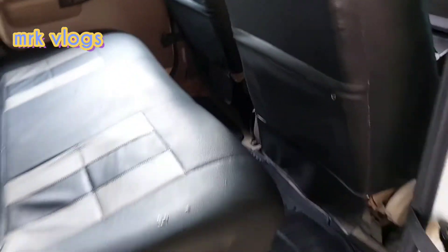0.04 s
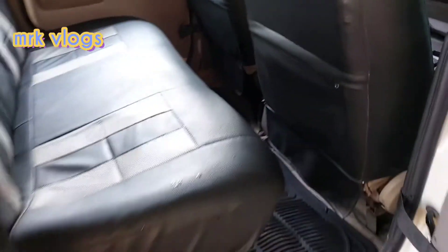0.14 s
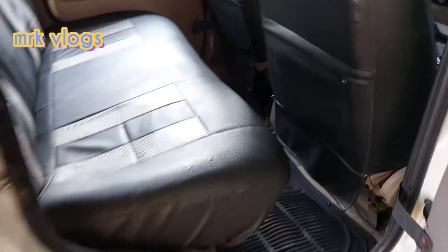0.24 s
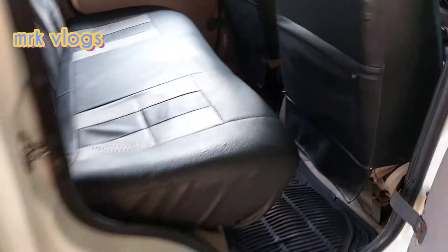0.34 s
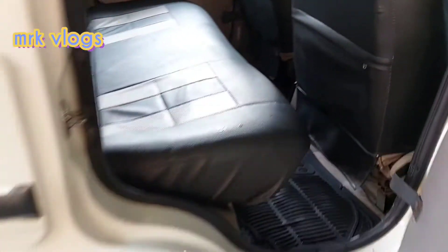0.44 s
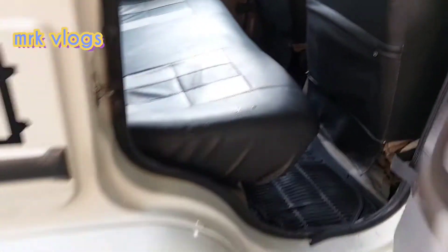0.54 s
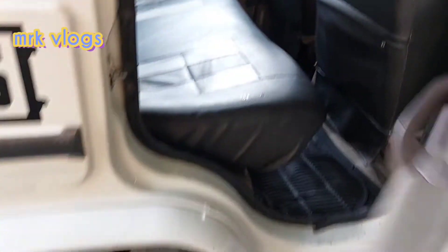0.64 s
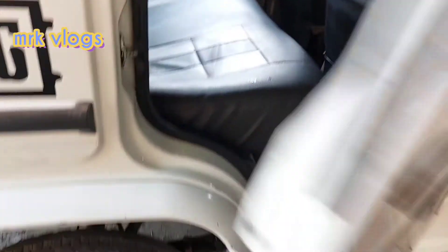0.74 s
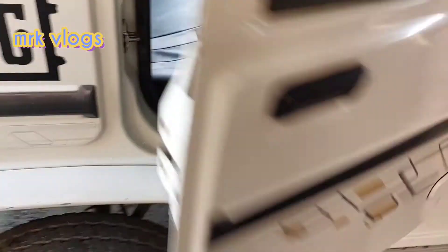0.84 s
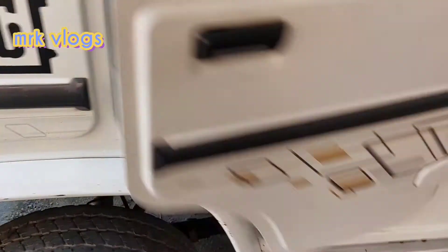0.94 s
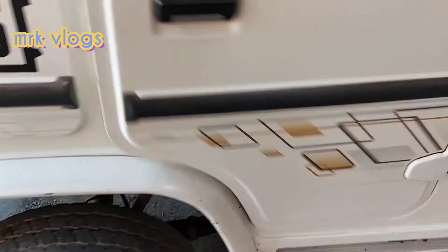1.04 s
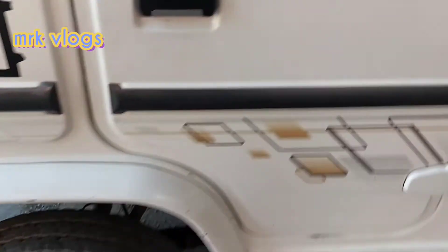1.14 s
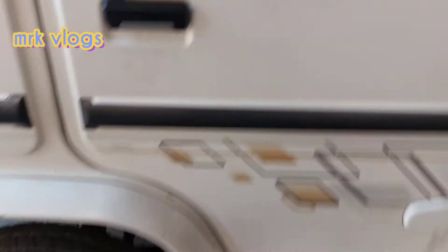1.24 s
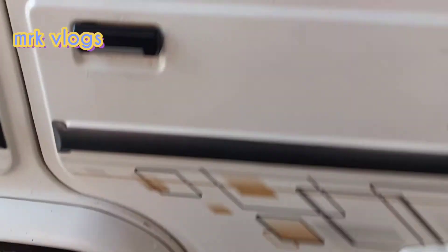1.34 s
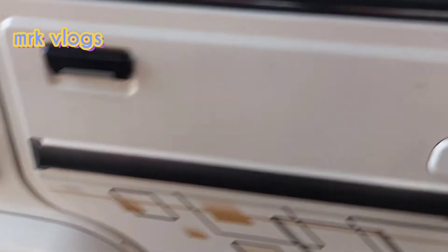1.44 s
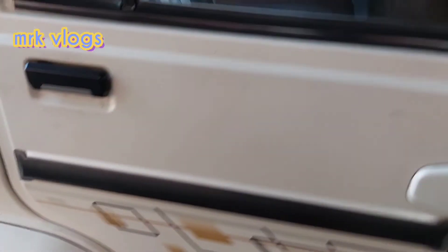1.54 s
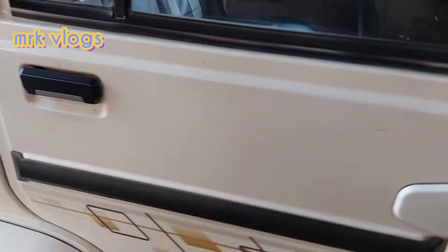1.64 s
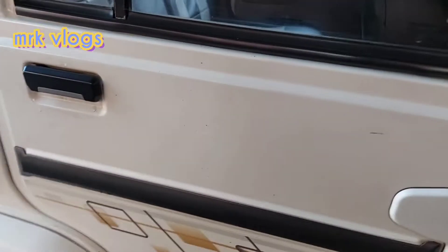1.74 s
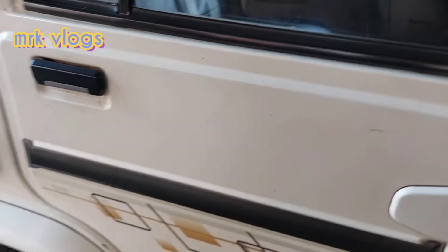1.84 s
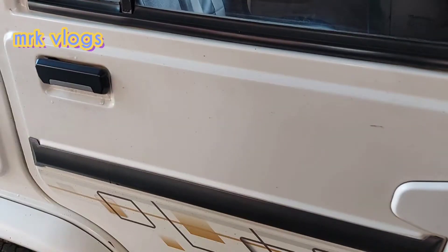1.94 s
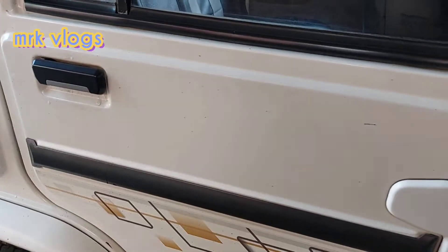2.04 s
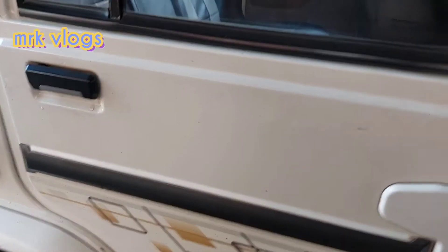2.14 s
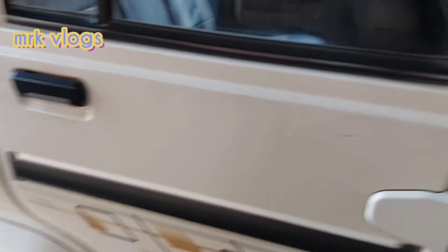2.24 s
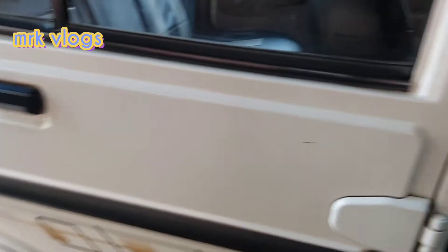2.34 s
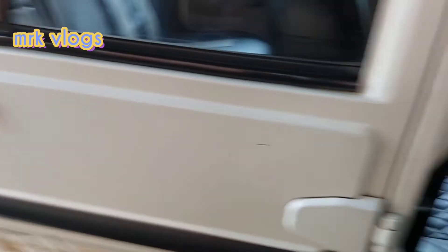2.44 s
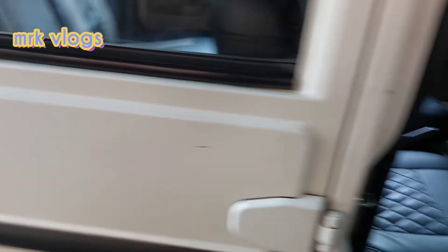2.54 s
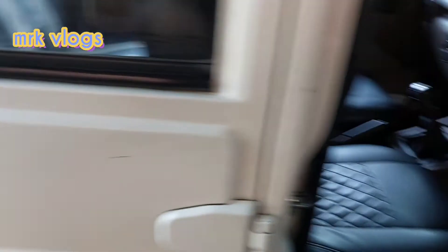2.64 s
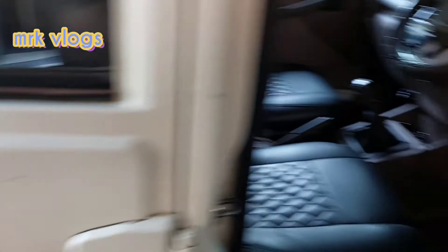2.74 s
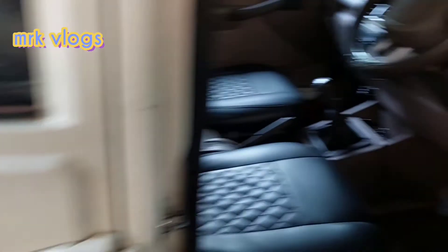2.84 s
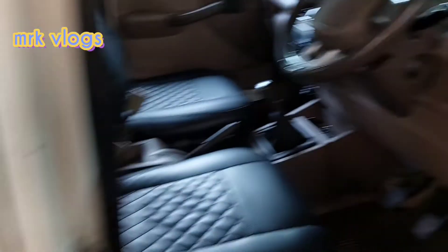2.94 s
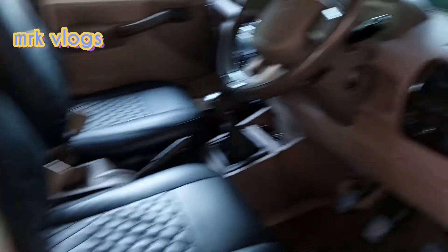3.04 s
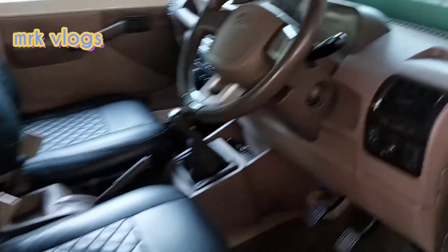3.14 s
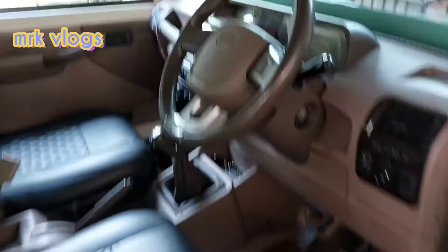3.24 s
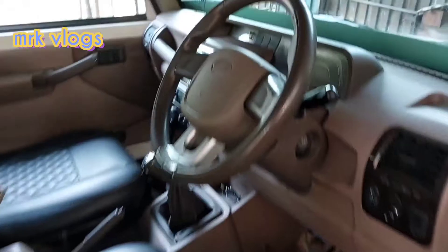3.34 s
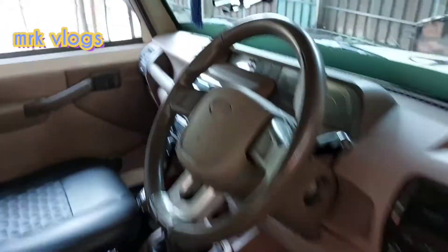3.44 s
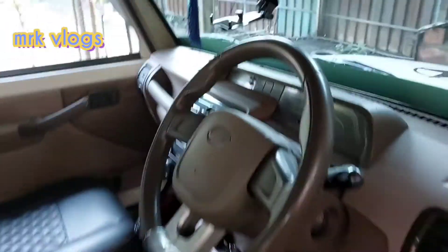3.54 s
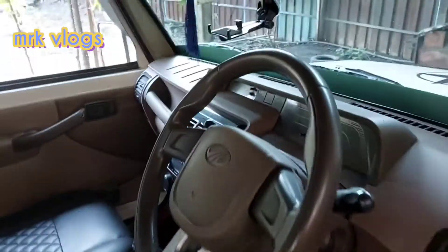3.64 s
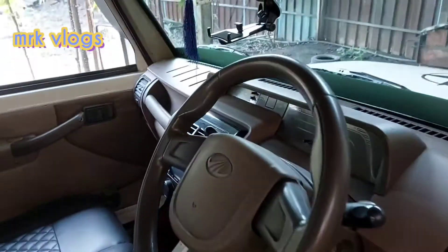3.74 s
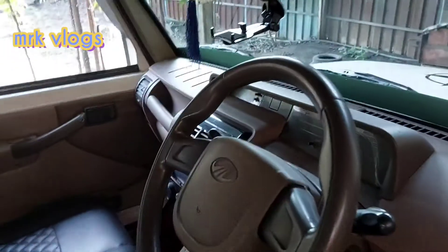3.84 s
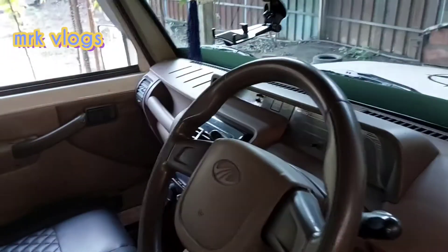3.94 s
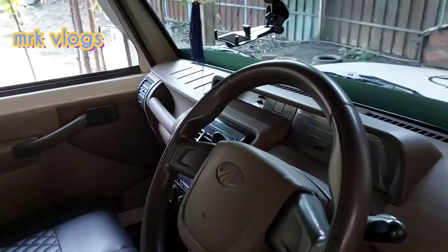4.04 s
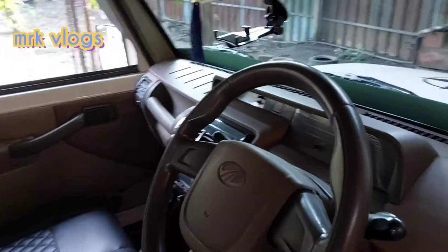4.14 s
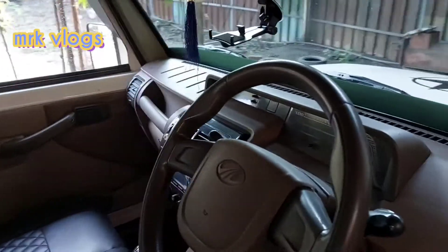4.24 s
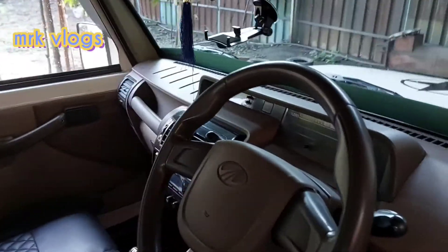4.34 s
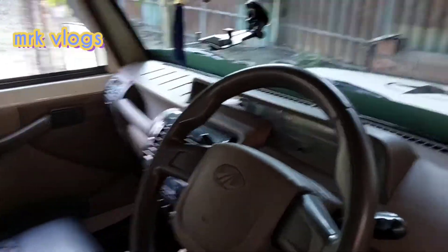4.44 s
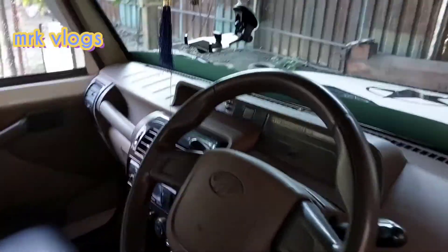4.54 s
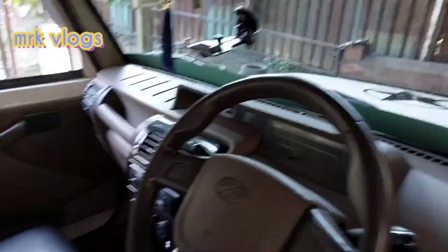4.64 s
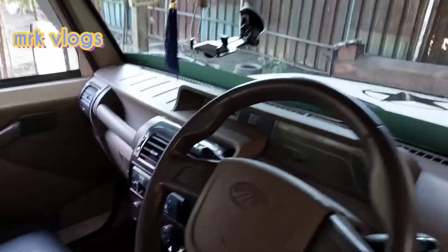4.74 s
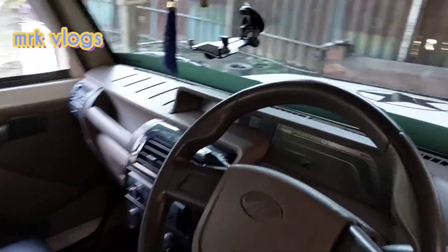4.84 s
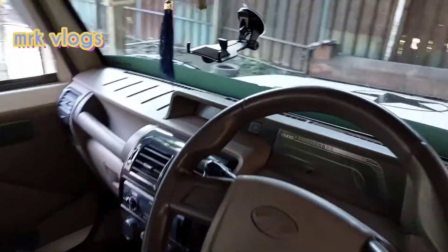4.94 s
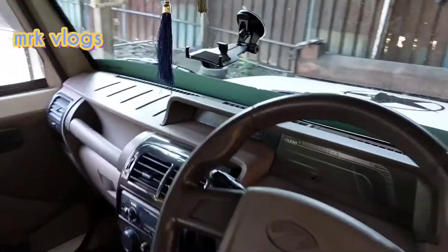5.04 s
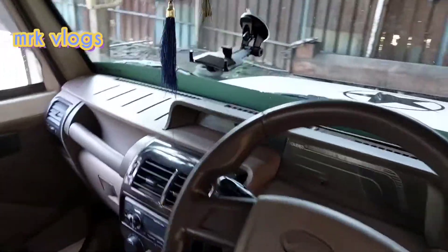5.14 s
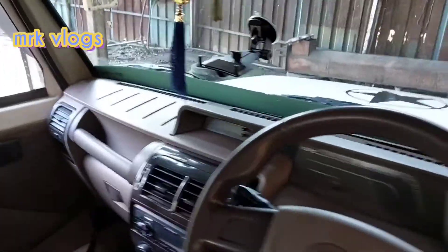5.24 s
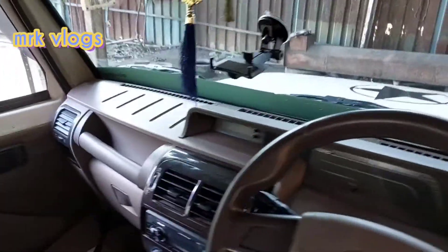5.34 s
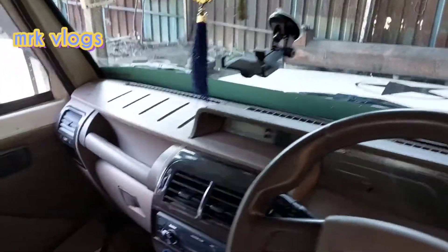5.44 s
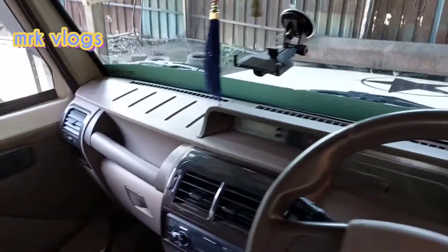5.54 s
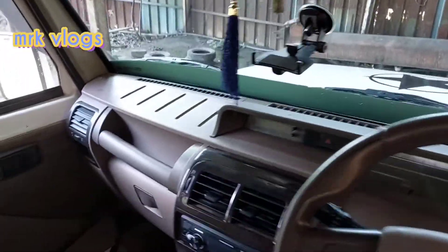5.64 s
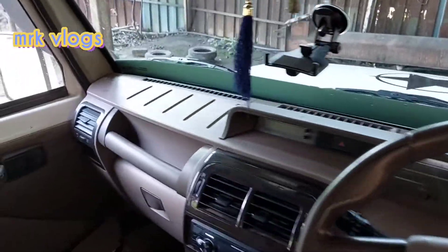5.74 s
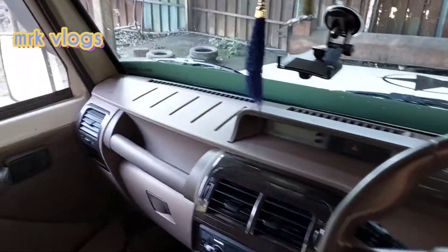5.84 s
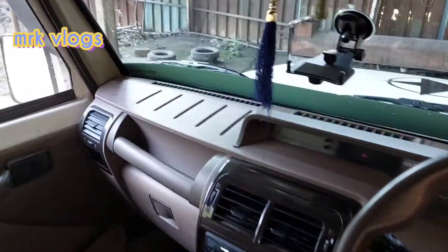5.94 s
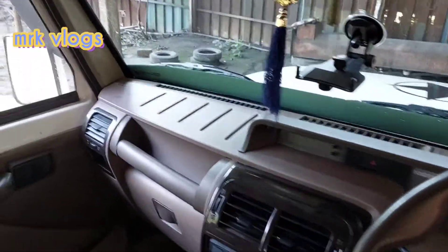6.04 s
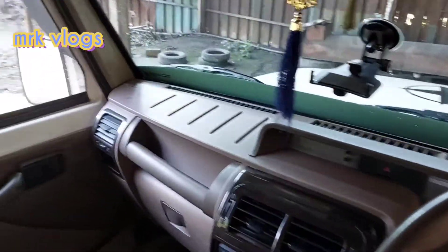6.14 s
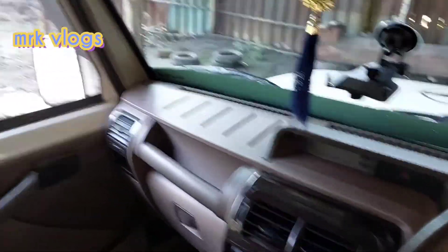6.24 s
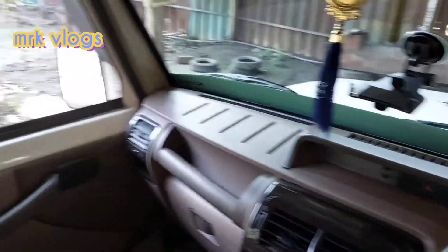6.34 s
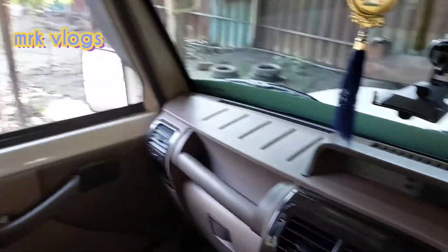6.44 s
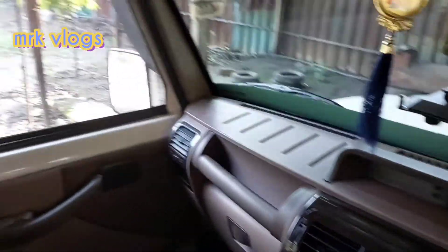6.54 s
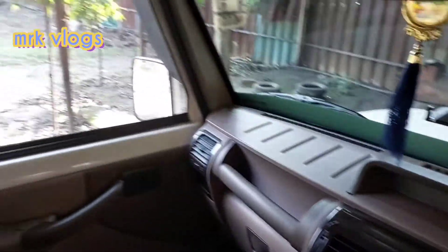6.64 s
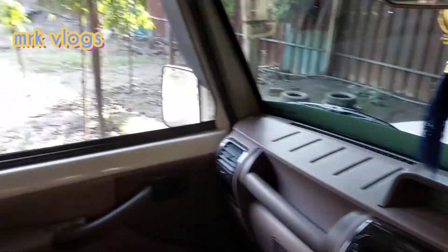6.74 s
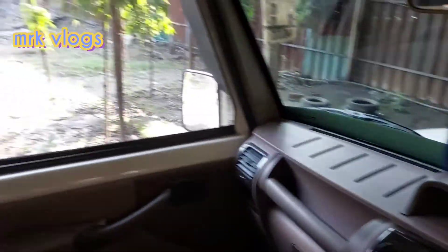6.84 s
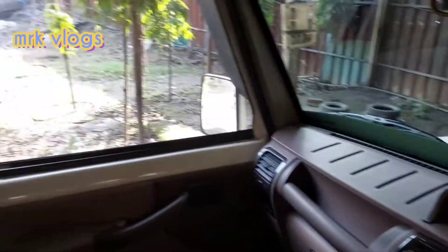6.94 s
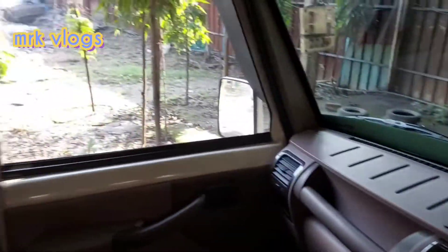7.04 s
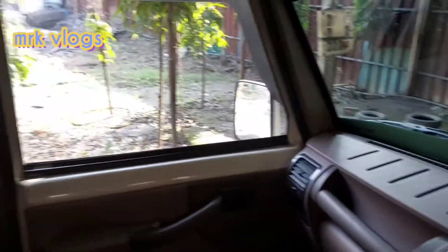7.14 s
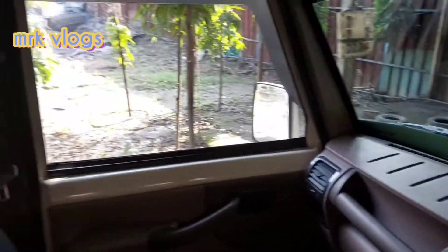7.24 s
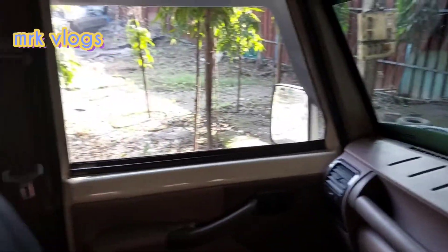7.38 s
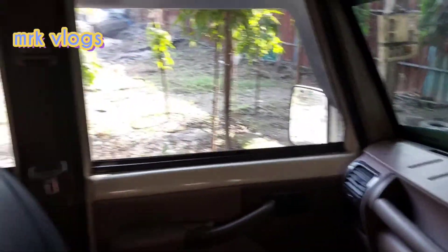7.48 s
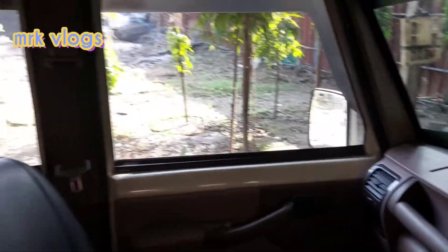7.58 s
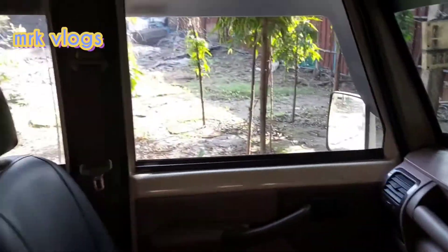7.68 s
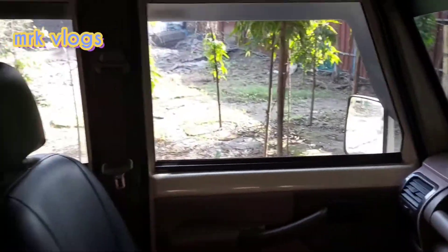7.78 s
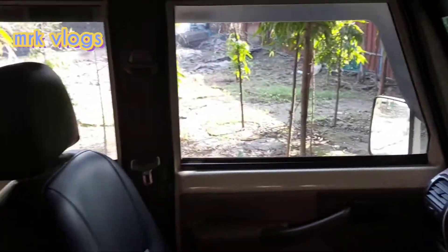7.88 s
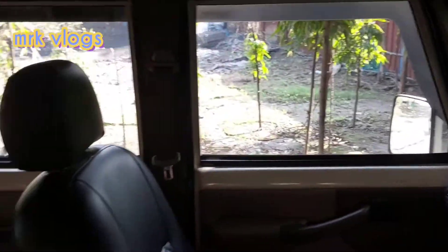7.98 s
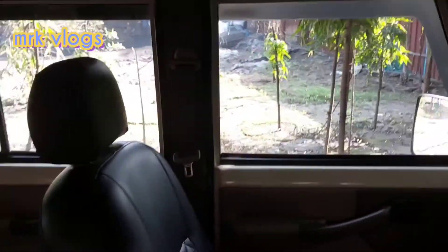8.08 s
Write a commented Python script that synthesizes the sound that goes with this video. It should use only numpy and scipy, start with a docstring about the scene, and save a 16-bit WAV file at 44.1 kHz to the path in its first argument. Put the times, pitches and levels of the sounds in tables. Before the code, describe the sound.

A handheld stereo microphone beside a parked vehicle picks up soft road wash, slightly left, a throbbing low engine idle some way off and a very faint grainy hiss. At 0.1 s a finger tick and tiny key clink; near 0.8-1.1 s faint contact, cloth brushes and small ticks. At 1.32 s the door slams: a loud dense metal bang, latch clatter and deep thuds within a tenth of a second, with a short boomy tail. A tick at 1.73 s. At 2.17-2.3 s quieter hollow knocks on trim with a scuff. Low bumps at 2.8-2.9 s. Keys clink at 3.03 s, then jingle brightly at 3.75-3.95 s; scuffs at 4.0-4.1 s and 4.35 s. Sharp close finger snaps at 4.77-4.84 s, strongly left, and a faint tick at 5.1 s. From then to 8.1 s only the duller, quieter road and idle hum inside the cab.

```python
"""A van door slams: blows of metal excite modes of the body and a dense tail, as later knocks on the trim do.
A hand-held camera leans into the cab: fingers tick as tiny snaps, and seal and hand thud as falling sines.
Keys clink as chattering contacts on short close modes; shoes and cloth scuff as trains of friction slips.
Behind lie a road, as noise shaped by the shelter of the cab, an idling engine some way off, as sines on
multiples of its firing rate, and a thin grainy hiss."""
import sys
import numpy as np
from scipy import signal
from scipy.fft import rfft, irfft
from scipy.io import wavfile
from scipy.ndimage import uniform_filter1d

SR = 44100
rng = np.random.default_rng(int(sys.argv[2]) if len(sys.argv) > 2 else 0)


def persist_wave(psi):
    """Save psi, clipped to +-1, as 16-bit WAV."""
    counts = np.round(np.clip(psi, -1, 1) * 32767).astype(np.int16)
    wavfile.write(sys.argv[1], SR, np.atleast_2d(counts).T)


N = 357651  # length in samples

# Where the camera is: time_s, shelter in the cab [0-1], bearing of the road [-1 left to 1 right, clipped],
# direct share of the road [0-1]
CAMERA_POSE = [(0, 0.24, -1.095, 0.07), (1.2, 0.5, -1.513, 0.17), (1.7, 0.36, -0.117, 0),
               (2.2, 0.4, 0.937, 0.21), (2.7, 0.31, 0.014, 0), (3.7, 0.38, 0.4925, 0.54),
               (4.5, 0.45, 0.1583, 0.04), (5.2, 0.75, 0.7655, 0), (6.2, 0.75, 0.811, 0.53),
               (7.1, 0.86, 0.7478, 0.07), (8.11, 0.6, -0.0252, 0.01)]
# Stereo shading by the camera body: pitch_hz, share of the left-right level difference
BODY_SHADING = [(300, 0.), (700, -0.1187), (1500, 0.7952), (4000, 1.4861), (9000, 1.1614), (15000, -2.5)]
# Colour of rubbed cloth, also used for the hiss: pitch_hz, relative level [dB per Hz]
CLOTH_COLOUR = [(2500, -27), (5000, 0), (8000, -3), (12000, -2.5), (16500, -6)]
PORT_GAP_S = 0.00046795  # travel time of sound from one microphone port to the other
SLIPS_PER_S = 9000.0  # average density of the tiny slips in scuffs, rustles and hiss


def amp(db):
    """Gain of a level in dB."""
    return 10 ** (np.asarray(db) / 20)


def evened(x):
    """Scaled to rms 1."""
    return x / np.sqrt(np.mean(x ** 2) + 1e-20)


def read(points, hz):
    """A spectrum table at the frequencies hz, interpolated over log frequency."""
    f, value = np.transpose(points)
    return np.interp(np.log(hz + 1), np.log(f + 1), value)


def along(rows, t):
    """The columns of a curve table at the times t."""
    s, *columns = np.transpose(rows)
    return [np.interp(t, s, c) for c in columns]


def coloured(x, points):
    """x filtered by a spectrum table."""
    size = x.shape[-1]
    gain = amp(read(points, np.fft.rfftfreq(size, 1 / SR)))
    return irfft(rfft(x) * gain, size)


def panned(x, pan_db):
    """Two channels, the left louder than the right by pan_db."""
    return np.array([amp(pan_db / 2), amp(-pan_db / 2)]).reshape(2, -1) * x


def add(mix, s, sound):
    """Mixes a two-channel sound in at s seconds."""
    part = mix[:, round(s * SR):][:, :sound.shape[1]]
    part += sound[:, :part.shape[1]]


def wander(t, per_s):
    """A random drift along straight lines between normal draws, per_s of them a second."""
    return np.interp(t * per_s, np.arange(200), rng.standard_normal(200))


def ring(modes, t, channels):
    """Decaying sines with random phase for each channel."""
    phase = rng.random((len(modes), channels, 1))
    return sum(amp(db - 60 * t / t60) * np.sin(2 * np.pi * (hz * t + p))
               for (hz, db, t60), p in zip(modes, phase))


def grit(size, per_s, spread_db):
    """Two unrelated trains of tiny slips of uneven size."""
    unevenness = amp(spread_db * np.minimum(rng.exponential(1, (2, size)), 4))
    slips = rng.random((2, size)) < per_s / SR
    return unevenness * rng.standard_normal((2, size)) * slips


def diffuse(size):
    """Noise at two ports in a diffuse field: alike in the bass, unrelated in the treble."""
    a, b = rfft(rng.standard_normal((2, size)))
    same = np.sinc(2 * np.fft.rfftfreq(size, 1 / SR) * PORT_GAP_S)
    return irfft([a, same * a + np.sqrt(1 - same ** 2) * b], size)


def road():
    """Noise that is partly diffuse at the two ports, partly from one bearing; the cab dulls it."""
    # Road wash: time_s, relative level_db, left-right pan_db before the shading share
    wash = [(0.0, -42, 5.5), (0.38, -39.5, 6), (1.25, -36, 6), (1.49, -37.5, 6), (1.54, -43.5, 5.5),
            (2.19, -45.5, 5), (2.91, -40, 4.5), (4.81, -40.5, 4), (4.92, -42.5, -0.5), (5.6, -47.5, -1),
            (6.53, -48.5, 0.5), (7.86, -45.5, 0.5), (8.11, -46, 0.5)]
    # Road colour in the open: pitch_hz, relative level [dB per Hz]
    open_air = [(24, -20.5), (40, -6.5), (85, -5), (191, -11), (233, -11.5), (406, -14), (593, -20),
                (1140, -18.5), (1430, -23), (2200, -18.5), (4450, -30), (7180, -50), (13200, -52.5),
                (15300, -64.5), (16500, -73)]
    # Road colour inside the cab: pitch_hz, relative level [dB per Hz]
    in_cab = [(40, -12.5), (65, -4.5), (120, -12.5), (200, -16), (300, -19), (500, -23.5), (1050, -24),
              (1450, -27.5), (2050, -28), (2800, -38.5), (3500, -42), (4800, -46.5), (6500, -58.5),
              (16500, -66)]
    frames, hz = N // 512 + 5, np.fft.rfftfreq(2048, 1 / SR)[:, None]
    t = np.arange(frames) * 512 / SR
    db, pan_db = along(wash, t)
    shelter, bearing, direct = along(CAMERA_POSE, t)
    shelter, direct = np.clip(shelter, 0, 1), np.clip(direct, 0, 1)
    a, b, c, d, patches = rng.standard_normal((frames, 1025, 5)).T
    # patches of time and frequency that swell or sink by chance
    patches = uniform_filter1d(patches, size=16, axis=0)
    patches = evened(uniform_filter1d(patches, size=5, axis=1))
    colour = amp((1 - shelter) * read(open_air, hz) + shelter * read(in_cab, hz))
    colour /= np.sqrt((colour[14:186] ** 2).sum(0))  # the level is set by 300-4000 Hz
    # a diffuse field is alike at both ports as a sinc; a plane wave only arrives later at one
    lag_s = PORT_GAP_S * np.clip(bearing, -1, 1)
    plane_wave = np.exp(2j * np.pi * hz * lag_s)
    same = 0.8989 * ((1 - direct) * np.sinc(2 * hz * PORT_GAP_S) + direct * plane_wave)
    left = a + 1j * b
    right = same * left + np.sqrt(np.clip(1 - abs(same) ** 2, 0, 1)) * (c + 1j * d)
    tilt = amp(pan_db * read(BODY_SHADING, hz) / 2)
    z = np.array([left * tilt, right / tilt]) * colour * amp(db + 1.3139 * patches)
    return amp(1.0) * signal.istft(z, nperseg=2048, noverlap=1536)[1][:, :N]


def engine():
    """Sines on multiples of the firing rate, nearly in step so that they throb; the cab dulls the odd orders."""
    # Idling engine: time_s, firing rate_hz, level_db of order 2, of order 4, of order 6 (before the wander)
    idle = [(0.0, 29.3, -47, -44, -49.5), (0.35, 29.5, -40.5, -36.5, -55.5), (0.5, 29.2, -41.5, -40.5, -45),
            (0.94, 29.9, -42.5, -37.5, -63.5), (1.11, 30.8, -36, -36.5, -51.5),
            (1.6, 32, -40.5, -41.5, -53.5), (2.23, 31.2, -41.5, -58.5, -53.5),
            (2.72, 32.1, -41, -60, -56.5), (3.03, 31.9, -29.5, -41, -45), (3.38, 29.1, -44.5, -41.5, -69.5),
            (3.85, 29.91, -44.5, -46, -57), (4.26, 30, -47.5, -45, -48.5), (4.6, 30, -65, -52.5, -45.5),
            (5.16, 30, -46, -42.5, -52.5), (5.45, 28.9, -48.5, -38, -50.5), (5.87, 29.1, -44, -44, -50),
            (6.57, 28.9, -41, -43.5, -55), (7.12, 29.8, -37, -47.5, -52.5),
            (7.5, 29.2, -36.5, -54.5, -61.5), (7.8, 30.35, -36.5, -47, -47), (8.11, 29.98, -40.5, -57, -48)]
    # Odd orders: multiple of the firing rate, level_db in the open, level_db in the cab (before the wander)
    odd_orders = [(3, -35.5, -62.5), (5, -50, -64.5)]
    fading_db, fades_per_s = 4.0, 5.0  # odd orders fade in and out by chance
    t = np.arange(N) / SR
    hz, *even_db = along(idle, t)
    shelter = np.clip(along(CAMERA_POSE, t)[0], 0, 1)
    levels = [(2 * k + 2, db) for k, db in enumerate(even_db)]
    for k, out_db, in_db in odd_orders:
        sheltered_db = out_db + shelter * (in_db - out_db)
        levels.append((round(k), sheltered_db + fading_db * wander(t, fades_per_s)))
    turns = np.cumsum(hz) / SR
    out = np.zeros(N)
    for k, db in levels:
        level = amp(db + 1.62 * wander(t, 13.0))
        out += level * np.sin(2 * np.pi * (k * turns + 0.03684 * wander(t, 1.9232)))
    return panned(np.sqrt(2) * out, -1.923)  # sqrt(2): the levels are rms


def hiss():
    """A thin treble hiss of dense slips, its level drifting."""
    # Faint hiss: time_s, rms level_db
    levels = [(0, -70.5), (1.4, -63.5), (1.9, -70.5), (2.5, -84.5), (3.3, -64), (4.7, -63.5), (5, -69),
              (6.57, -72.5), (7.34, -64.5), (7.84, -74.5), (8.11, -77)]
    grain = evened(coloured(grit(N, SLIPS_PER_S, 1.419), CLOTH_COLOUR))
    return amp(along(levels, np.arange(N) / SR)[0]) * grain


def rubbing(stroke, spectrum, spread_db):
    """Slips of friction through the colour of the rubbed material, swelling to a peak and fading."""
    s, db, swell, fade, pan_db = stroke
    start = max(s - swell, 0)
    t = np.arange(start, s + 1.5 * fade, 1 / SR)
    level_db = db - 20 * np.maximum((s - t) / swell, (t - s) / fade)  # 20 dB over each swell or fade time
    sound = evened(coloured(grit(len(t), SLIPS_PER_S, spread_db), spectrum))
    sound = sound * signal.windows.tukey(len(t), .03)
    return start, amp(level_db) * panned(sound, pan_db)


def rustles():
    """Cloth brushes: friction slips in the bright colour of cloth."""
    # Cloth strokes: peak_s, peak level_db, swell_s, fade_s, left-right pan_db
    strokes = [(0.27, -60, 0.3022, 0.797, 1.5), (0.77, -55, 0.01365, 0.216, 0.5),
               (0.965, -49, 0.0213, 0.2308, 2), (1.08, -55.5, 0.1062, 0.26, 0.5),
               (1.78, -56.5, 0.12, 0.062, 1), (2.12, -61.5, 0.283, 0.5357, 0), (2.3, -55, .04, 0.18, -0.5),
               (3.05, -59, .6, 0.72, 1), (3.809, -49.5, .02, .1, 1), (3.861, -50.5, 0.0285, 0.08075, 0.5),
               (4.0, -59.5, 0.02353, 0.525, -3.5), (4.766, -49, 0.022, 0.055, 14.5),
               (4.81, -57, 0.022, .09, 12.5), (4.88, -59, 0.0821, 0.0933, -2)]
    out = np.zeros((2, N))
    for stroke in strokes:
        add(out, *rubbing(stroke, CLOTH_COLOUR, 1.92))
    return out


def ticks():
    """Fingers on the camera: a bright snap, about one cycle of shell ring with a low bounce, in a faint dying
    hiss that starts just before the snap."""
    # Dry ticks near the microphone: start_s, relative level_db, relative shell ring_db, left-right pan_db
    taps = [(0.122, -26.5, 2, 19.5), (0.7701, -40, -1.5, 10.5), (0.9581, -40, 7, 4), (0.9944, -46, 6, 4.0),
            (1.1094, -33, 3, 3), (1.7342, -25, -24, 13.5), (1.7745, -39.5, -11.5, 6.5),
            (2.124, -43, 0.5, 8.0), (2.7735, -30.5, 3, 0), (3.1507, -38, 6.5, 17.5),
            (3.2155, -31.5, 6.5, 2), (3.2623, -37, 8.5, 3.5), (3.8521, -26, -0.5, 4.5),
            (4.022, -26.5, 16.5, 6.5), (4.3697, -24.5, 3.5, -14.5), (4.774, -26.5, 12, 20),
            (4.808, -12.5, 4.5, 25.5), (4.8339, -21, -11.5, 5), (4.8404, -38.5, -3, 4.0),
            (4.8649, -33.5, -2.5, 2.5), (5.1138, -35.5, 0, 0.5)]
    t, out = np.arange(600) / SR, np.zeros((2, N))
    peak_s = .0009  # the contact comes this long after the start
    brief = np.exp(-((t - peak_s) / .00016) ** 2)
    shell = np.sin(2 * np.pi * 2900 * (t - peak_s)) * brief
    shell -= 0.14 * np.sin(2 * np.pi * 500 * t) * np.exp(-t / 0.0009509)
    treble = signal.butter(2, 3600., "high", fs=SR, output="sos")
    for s, db, shell_db, pan_db in taps:
        contact = 3 * signal.unit_impulse(len(t), round(peak_s * SR))
        contact += rng.standard_normal(len(t)) * brief
        snap = signal.sosfilt(treble, contact)
        snap = snap / np.linalg.norm(snap) * 0.7935
        dying_hiss = amp(-27.0) * rng.standard_normal((2, len(t))) * np.exp(-t / 0.003157)
        tick = snap + amp(shell_db - 9.5) * shell + dying_hiss
        add(out, s, amp(db + 2.5) * panned(tick, pan_db))
    return out


def keys():
    """Small steel rings chatter: a few quick contacts, each ringing short close modes."""
    # Keys touching: start_s, peak level_db (before click and pan), pitch_hz of the mode struck, left-right pan_db
    clinks = [(0.125, -40.5, 13240, -3), (0.9792, -36, 12800, -4), (1.0569, -45, 13000, -1),
              (1.1758, -50, 13100, 0.5), (1.79, -53.5, 13210, -5), (2.035, -50.5, 12920, -6),
              (2.3805, -50, 13100, -10.5), (3.031, -40, 12800, -6), (3.037, -36.5, 13300, -3.5),
              (3.0482, -38.5, 13450, -1.5), (3.1162, -47, 13080, -6.5), (3.378, -62.5, 13090, -8.5),
              (3.478, -51, 12790, -6.0), (3.7469, -50.5, 12900, -12), (3.7693, -53, 13020, -12),
              (3.7835, -43, 13200, -10), (3.805, -34, 12870, -19), (3.8197, -31.5, 12980, 0),
              (3.854, -26.5, 13600, -3.0), (3.8815, -34, 13280, -3.5), (3.91, -44.5, 12900, -7),
              (3.9461, -34.5, 13290, 0), (4.336, -44, 12680, -14.5), (4.369, -46, 13670, -9.5),
              (4.4724, -45.5, 12850, -9.5)]
    # Modes of a key: pitch ratio, relative level_db, share of the decay time
    key_modes = [(1., 0, 1.), (.98, -7, .5), (1.025, -9, .4), (.34, -30, .8), (.62, -26, .3),
                 (.89, -20, .3)]
    key_t60_s = 0.03122
    t, out = np.arange(SR // 6) / SR, np.zeros((2, N))
    for s, db, hz, pan_db in clinks:
        modes = [(hz * ratio, level_db, key_t60_s * share) for ratio, level_db, share in key_modes]
        ringing = ring(modes, t, channels=2)
        chatter = grit(len(t), 910.0, 2.145)[:1] * np.exp(-t / 0.008974)
        contacts = chatter + signal.unit_impulse(len(t))
        clink = signal.fftconvolve(ringing, contacts, axes=1)[:, :len(t)]
        # differenced noise gives a bright click
        click = amp(-17.5) * np.diff(rng.standard_normal((2, len(t) + 1))) * np.exp(-t / 0.003025)
        add(out, s, amp(db) * panned(clink / abs(clink).max() + click, pan_db))
    return out


def struck(blows, body_modes, dense, tail_db, bass_t60, treble_t60):
    """Each blow is a short rattle that cracks, rings the modes, spits treble and feeds a dense tail."""
    # Bare contact noise: pitch_hz, relative level [dB per Hz]
    crack_colour = [(300, -18.5), (700, 3.5), (2200, 11.5), (4500, -16.5), (8000, -35.5)]
    spit_colour = [(2500, -22.5), (5000, -5), (9000, -4.5), (16000, -12.0)]  # pitch_hz, dB per Hz
    t, out, drive = np.arange(SR // 4) / SR, np.zeros((2, N)), np.zeros((2, N))
    fade = np.cos(np.pi / 2 * np.minimum(t / .19, 1)) ** 2  # every burst has died after .19 s
    band_hz = np.fft.rfftfreq(len(t), 1 / SR)
    for s, db, treble_db, tilt_db, t60, pan_db in blows:
        rattle = diffuse(len(t)) * amp(-60 * t / t60)
        # a soft contact favours the low modes, a hard one the high
        modes = [(hz, level_db + tilt_db * np.log2(hz / 1200), decay) for hz, level_db, decay in body_modes]
        body = signal.fftconvolve(rattle, ring(modes, t, channels=1), axes=1)[:, :len(t)]
        tilted = [(hz, level_db + tilt_db * np.log2(hz / 1200)) for hz, level_db in crack_colour]
        crack = coloured(rattle, tilted)
        spit = coloured(rattle, spit_colour)
        parts = zip((body, crack, spit), (0, -.8, treble_db))
        # parts are balanced by the rms of their first 400 samples
        burst = sum(amp(part_db) * part / np.sqrt((part[:, :400] ** 2).mean()) for part, part_db in parts)
        # the camera body shades the channels by frequency
        burst = irfft(panned(rfft(burst), pan_db * read(BODY_SHADING, band_hz)), len(t))
        add(out, s, amp(db - 11.5) * burst * fade)
        add(drive, s, amp(db) * rattle[:1] / np.linalg.norm(rattle[0]) * np.ones((2, 1)))
    t = np.arange(SR // 2) / SR
    noise = evened(coloured(diffuse(len(t)), dense))
    bass = coloured(noise, [(400, 6.5), (1200, -42)])
    tail = bass * amp(-60 * t / bass_t60) + (noise - bass) * amp(-60 * t / treble_t60)
    tail = tail * (1 - np.exp(-t / 0.001354))  # soft onset
    return out + amp(tail_db) * signal.oaconvolve(drive, tail, axes=1)[:, :N]


def door():
    """The slam and latch clatter: metal on metal rings the door, its sheet metal and the cab air."""
    # Blows: start_s, relative level_db, relative treble_db, hardness [dB per octave], rattle_t60_s,
    # left-right pan_db before the shading share
    blows = [(0.823, -27, -31.5, 4, 0.01056, 8), (1.324, -1.5, -33.5, 0, 0.05043, 6.5),
             (1.337, -7, -14, 0, 0.0719, 3.5), (1.346, -12, -11.5, 5.5, 0.0941, 7.5),
             (1.367, -10.5, -12, 4.5, 0.0486, 8.5), (1.389, -18.5, -18.5, 2, 0.0942, 6.5),
             (1.409, -21, -21, -1.5, 0.1542, 8.5)]
    # Modes of the door: pitch_hz, relative level_db, t60_s
    door_modes = [(281.2, -20, 0.1113), (455, -11.5, 0.05324), (679, -21.5, 0.0405), (995.6, -4.5, 0.03504),
                  (1168, -12, 0.0153), (1455.4, -33, 0.0428), (1644.2, -9, 0.0252), (1842, -11.5, 0.01647),
                  (2196.6, -18.5, 0.0693), (2250.7, -14, 0.0466), (2623, -16.5, 0.02136),
                  (3065.5, -21, 0.01302), (3980, -42, 0.0208), (4073.2, -18.5, 0.02993),
                  (4387.7, -24, 0.03606), (5091.5, -25.5, 0.0276), (5950, -33, 0.03267)]
    # Dense ringing of sheet metal and cab air: pitch_hz, relative level [dB per Hz]
    panel = [(26, -21), (45, -7.5), (222, -11.5), (370, -30.5), (441, -33), (840, -20), (959, -27.5),
             (1560, -28.5), (1990, -17.5), (2840, -82), (4050, -37), (9000, -51), (11700, -88),
             (19800, -120)]
    return struck(blows, door_modes, panel, tail_db=-15.0, bass_t60=0.4407, treble_t60=0.2949)


def thuds():
    """Dull pushes of door on seal and hand on camera: a sharp pressure dip, then slower dying swings."""
    # Pushes: start_s, peak level_db (before pan), settled pitch_hz, left-right pan_db
    pushes = [(1.308, -28, 75, 0), (1.333, -16.5, 128.2, 2.5), (1.346, -16, 254.8, -1),
              (1.368, -8.5, 121, 2), (1.374, -11, 55, 2.5), (1.38, -12, 218.1, -3.5),
              (1.401, -19, 188.3, 4.5), (1.414, -15, 198.2, -2), (1.429, -24, 239.8, 4),
              (1.457, -28.5, 161, -2), (2.263, -25.5, 89.02, 1), (2.816, -16, 74.56, -20.5),
              (2.88, -19.5, 96.82, -8), (4.772, -33, 298, 0), (4.867, -31.5, 243.8, -5)]
    thud_t60_s = 0.04937
    t, out = np.arange(SR // 4) / SR, np.zeros((2, N))
    for s, db, hz, pan_db in pushes:
        falling_hz = hz * (1 + 2.2687 * np.exp(-t / 0.0016683))
        turns = np.cumsum(falling_hz) / SR
        swing = -np.sin(2 * np.pi * turns) * (1 - np.exp(-t / 0.003151)) * amp(-60 * t / thud_t60_s)
        add(out, s, amp(db) * panned(swing / abs(swing).max(), pan_db))
    return out


def scuffs():
    """A shoe or seat scuffs: friction slips in a colour strongest in the upper middle."""
    # Scuff strokes: peak_s, peak level_db, swell_s, fade_s, left-right pan_db
    strokes = [(2.172, -37, 0.006423, 0.04504, 9.5), (3.153, -41.5, 0.016918, 0.1485, 6.5),
               (4.018, -32, .012, 0.08657, 4.5), (4.071, -31, .06, 0.06737, 4),
               (4.11, -38.5, .05, 0.04812, 0), (4.333, -43, .015, .06, 4.5),
               (4.371, -37.5, .006, 0.02675, 8.5)]
    # Colour of the scuffs: pitch_hz, relative level [dB per Hz]
    scuff_colour = [(530, -36), (900, -23.5), (1270, -15), (1670, -2.5), (2970, -10), (3230, -13),
                    (4120, -9), (7300, -21), (15200, -22), (15900, -33), (16500, -45.5)]
    out = np.zeros((2, N))
    for stroke in strokes:
        add(out, *rubbing(stroke, scuff_colour, 2.066))
    return out


def trim():
    """Knocks on the trim: blows ring its modes and the hollow behind it."""
    # Knocks: start_s, relative level_db, relative treble_db, hardness [dB per octave], rattle_t60_s,
    # left-right pan_db before the shading share
    knocks = [(2.173, -30.5, -9, 4, 0.00672, 4.66), (2.184, -26, -27.5, -20, 0.0713, 2.79),
              (2.205, -27.5, -31, 2, 0.006805, 3.657), (2.216, -26.5, -31, -19, 0.1366, 3),
              (2.259, -20.5, -9, -9.5, 0.1008, 3.345), (2.2665, -11, -17.5, -2, 0.02551, 6.83),
              (2.277, -26, -7.5, 10, 0.04253, 2.726), (2.296, -27, -21, -5.5, 0.275, 9.01)]
    # Modes of the trim: pitch_hz, relative level_db, t60_s
    trim_modes = [(190.75, -21, 0.0685), (304.5, -5, 0.0468), (407.37, -2, 0.0326), (480.3, -3.5, 0.0348),
                  (609.05, 1, 0.0724), (719.9, 4.5, 0.04326), (925.3, -7.5, 0.041), (1376.3, 3.5, 0.06924),
                  (1644, -22.5, 0.02483), (1977.8, -4.5, 0.0293), (2185.5, 4, 0.0416),
                  (2563, -13.5, 0.0251), (3234.7, -4, 0.03666), (4400, -15, 0.01895)]
    # Dense ringing behind the trim: pitch_hz, relative level [dB per Hz]
    hollow = [(71, -27.5), (120, 0.5), (307, -1), (705, -15), (875, -11), (1260, -26), (2160, -25.5),
              (3650, -37.5), (9000, -50), (11700, -75), (19800, -120)]
    return struck(knocks, trim_modes, hollow, tail_db=-10.5, bass_t60=0.2727, treble_t60=0.2946)


def scene():
    """All sources at the two microphone ports."""
    background = road() + engine() + hiss()
    handling = rustles() + ticks() + keys() + scuffs()
    return background + handling + door() + thuds() + trim()


def record(dry):
    """The bass cut of the microphone and the band limit of the recorder."""
    bass_cut_hz, edge_hz = 51.74, 16300
    bass_cut = signal.butter(2, bass_cut_hz, "high", fs=SR, output="sos")
    thinned = signal.sosfilt(bass_cut, dry)
    band_limit = signal.firwin(511, edge_hz, window=("kaiser", 9), fs=SR)
    return signal.oaconvolve(thinned, band_limit[None], "same", axes=1)


dry = scene()
out = record(dry)
persist_wave(out)
```